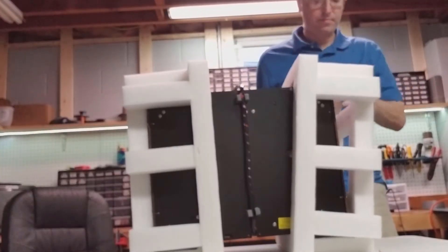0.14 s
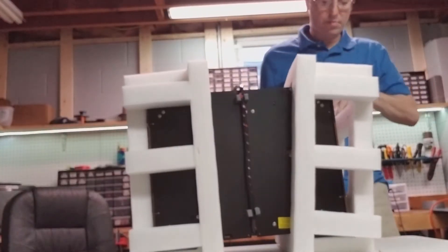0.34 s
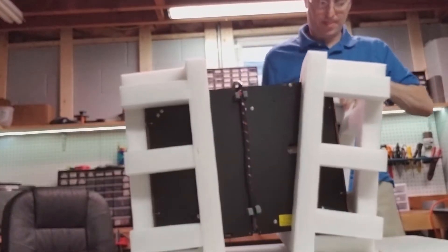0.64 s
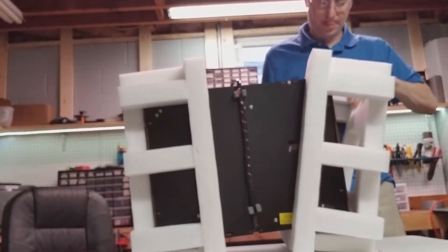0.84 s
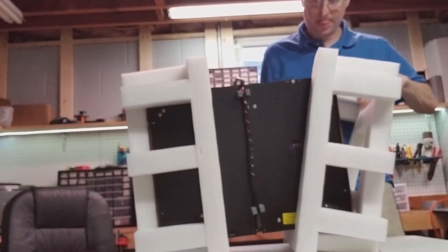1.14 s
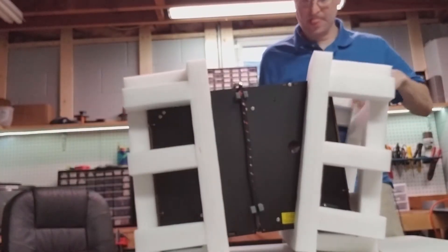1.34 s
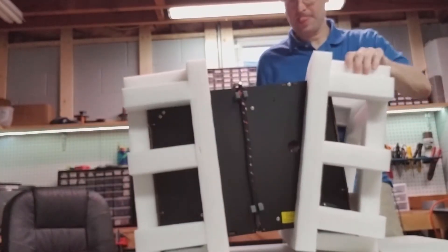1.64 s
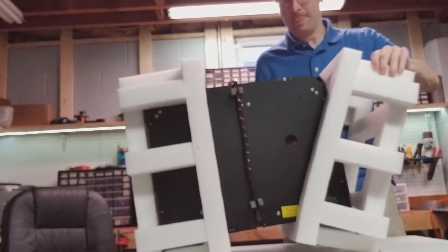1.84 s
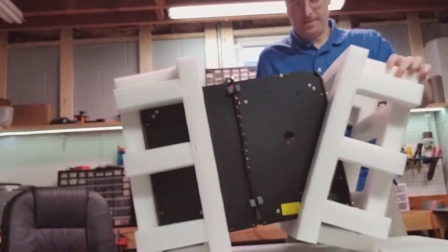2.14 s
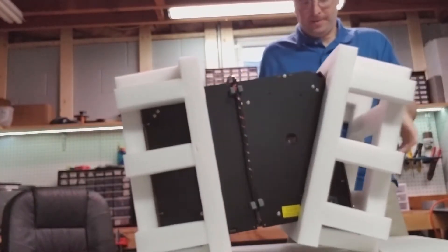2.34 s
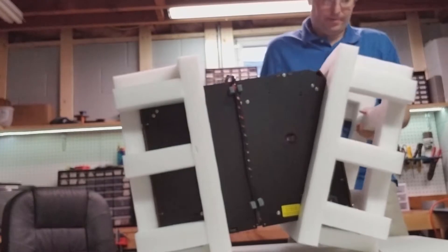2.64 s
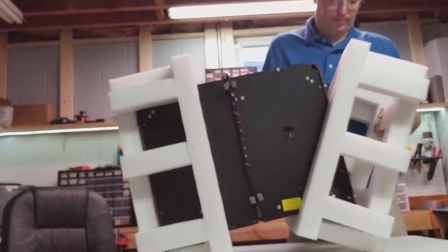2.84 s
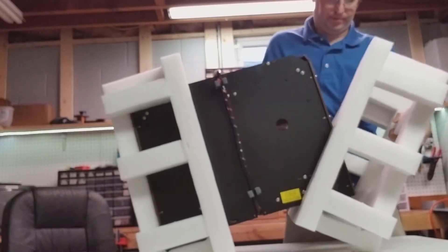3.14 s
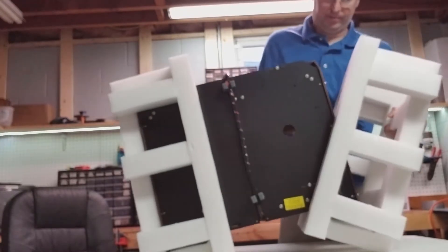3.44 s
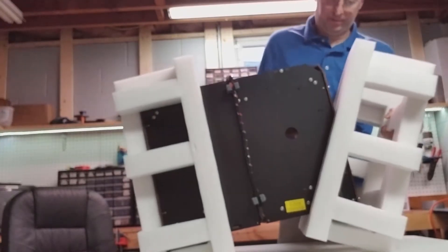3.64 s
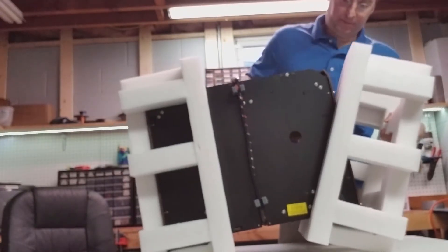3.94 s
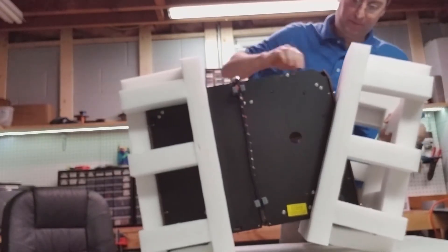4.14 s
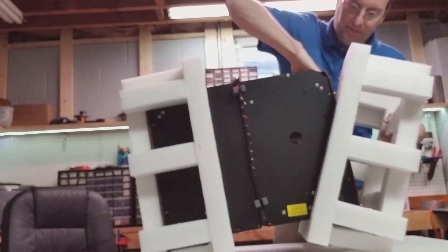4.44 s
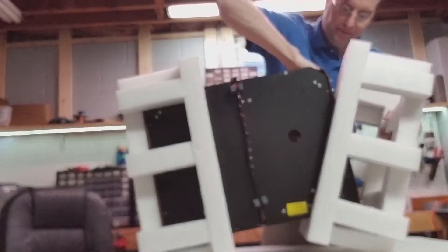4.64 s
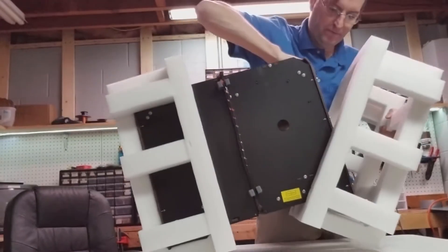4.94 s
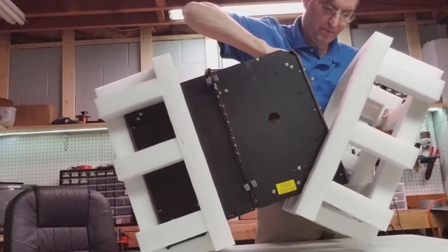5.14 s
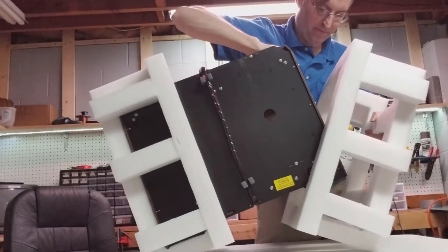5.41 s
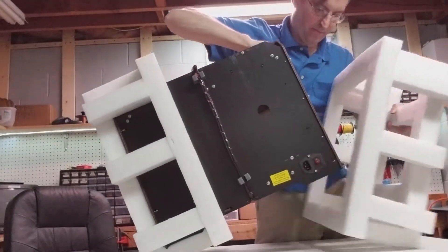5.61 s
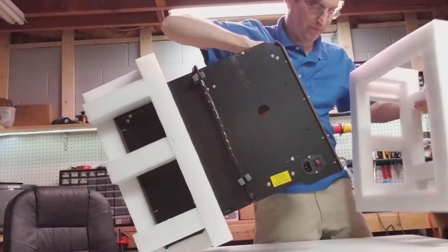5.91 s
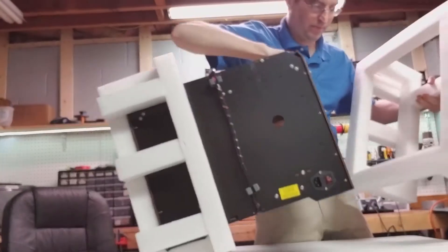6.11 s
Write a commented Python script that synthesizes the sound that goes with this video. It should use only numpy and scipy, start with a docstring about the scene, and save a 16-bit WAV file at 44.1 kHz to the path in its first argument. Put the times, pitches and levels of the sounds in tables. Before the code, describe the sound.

A foam packing frame is rocked loose from a heavy metal case, rubbing and scraping in short, uneven strokes. Soft knocks and brief groaning squeaks come as it sticks and slips, and the case bumps the bench with low thuds. The rubbing eases for a while, then the foam comes free in one quick, louder pull, followed by a light tap. Heard close up in a small, quiet workshop.

```python
"""Foam hisses and scrapes on metal: a packing frame is being rocked loose and dragged off a case.
It sticks and slips on the panels, groans under a firm grip and bumps, while the heavy case sets the
bench booming. The foam comes free in one quick pull and is tapped once more.
Heard from nearby in a small, quiet workshop, through a stereo microphone with two closely spaced ports."""
import sys
import numpy as np
from scipy import signal
from scipy.fft import rfft, irfft, next_fast_len
from scipy.io import wavfile

SR = 44100
rng = np.random.default_rng(int(sys.argv[2]) if len(sys.argv) > 2 else 0)


def generate_wav(signal):
    """Clip the signal to [-1, 1] and save it as 16-bit WAV at the path in sys.argv[1]."""
    frames = np.transpose(np.atleast_2d(signal))
    scaled = np.clip(frames, -1, 1) * 32767
    pcm = np.round(scaled).astype(np.int16)
    wavfile.write(sys.argv[1], SR, pcm)


N = 276507


def from_db(db):
    """Decibels to gain."""
    return 10 ** (np.asarray(db) / 20)


def unit_rms(x):
    """Scale to unit power."""
    return x / np.sqrt(np.mean(x ** 2) + 1e-20)


def at_hz(points, hz):
    """Read a table on a log-frequency axis."""
    known_hz, values = np.transpose(points)
    return np.interp(np.log(np.maximum(hz, 1)), np.log(known_hz), values)


def colour(x, spectrum):
    """Give a steady sound a smooth spectrum."""
    size = next_fast_len(N, True)
    gain = from_db(at_hz(spectrum, np.fft.rfftfreq(size, 1 / SR)))
    return irfft(rfft(x, size) * gain, size)[..., :N]


def butter(x, hz, kind, order=2):
    """Causal Butterworth filter."""
    sections = signal.butter(order, np.clip(hz, 10, .45 * SR), kind, fs=SR, output="sos")
    return signal.sosfilt(sections, x + 1e-18)


def add(track, start_s, sound):
    """Mix a short sound into a track."""
    start = max(round(start_s * SR), 0)
    track[start:start + len(sound)] += sound[:N - start]


# Still workshop air all round the microphone: frequency_hz, relative_density_db
AIR_SPECTRUM = [(15, -30), (25, -15), (50, -6), (75, -2), (115, -2), (150, -14), (420, -24.5), (950, -26),
                (1600, -29.5), (6400, -36.5), (13900, -35.5), (15500, -30)]

def room_tone(level_db=-67.5, apart_hz=600):
    """A low rumble common to both ports under a faint hiss of their own."""
    mid, side = colour(rng.standard_normal((2, N)), AIR_SPECTRUM)
    side = butter(side, apart_hz, "high", order=1) + from_db(-8) * side
    return from_db(level_db) * unit_rms(mid + side * [[1], [-1]])


# How long the small room rings: frequency_hz, t60_s
ROOM_DECAY = [(150, 0.53), (700, 0.11), (2000, 0.1), (12000, 0.13)]
# Echo against direct sound at the microphone, before echo_db is added: frequency_hz, ratio_db
ROOM_ECHO = [(100, -12.5), (300, -7), (1000, 2.5), (3000, 8), (12000, 3.5)]

def workshop(source, echo_db, port_lag_s=0.000096, lag_spread_s=0.00004, port_spacing_s=0.000586):
    """Direct sound reaches the left port first; dense echoes, alike at both in the bass, die by band."""
    t = np.arange(SR // 2) / SR
    hz = np.fft.rfftfreq(len(t), 1 / SR)
    alike = np.sinc(2 * hz * port_spacing_s)
    mid, side = rfft(rng.standard_normal((2, len(t))))
    diffuse = np.sqrt((1 + alike) / 2) * mid + np.sqrt((1 - alike) / 2) * side * [[1], [-1]]
    wet = from_db(at_hz(ROOM_ECHO, hz) + echo_db)
    total = np.sqrt(1 + wet ** 2)
    lags_s = np.array([[0], [rng.normal(port_lag_s, lag_spread_s)]]) + 20 / SR
    response = irfft(np.exp(-2j * np.pi * hz * lags_s) / total, len(t))
    edges_hz = np.append(0, np.geomspace(SR / 128, SR / 2, num=7))
    onset = 1 - np.exp(-t / 0.00022)
    for low, high in zip(edges_hz, edges_hz[1:]):
        decay = onset * from_db(-60 * t / at_hz(ROOM_DECAY, (low + high) / 2))
        band = irfft(diffuse * (hz >= low) * (hz < high) * wet / total, len(t))
        response += band * decay / np.linalg.norm(decay)
    return signal.oaconvolve(source[None], response, axes=1)[:, :N]


# Modes of the bench under the case: pitch_hz, level_db, t60_s
BENCH_MODES = [(53.5, -8.5, 0.49), (77.4, -0.5, 0.244), (100.7, -4, 0.15), (134.3, -4.5, 0.34),
               (198.2, 4.5, 0.2)]
# The heavy case rocks on the bench: start_s, gain_db
CASE_ROCKS = [(0.191, -47.5), (0.31, -52), (1.62, -40), (1.681, -41.5), (1.759, -55), (2.297, -41.5),
              (2.362, -44.5), (2.682, -52), (2.898, -56), (5.322, -44.5)]

def bench_booms(rise_s=0.012):
    """Each shift of the case's weight sets the bench booming."""
    out, t = np.zeros(N), np.arange(SR // 2) / SR
    for start_s, gain_db in CASE_ROCKS:
        boom = sum(from_db(level_db + rng.normal() - 60 * t / t60_s) * np.sin(2 * np.pi * pitch_hz * t)
                   for pitch_hz, level_db, t60_s in BENCH_MODES)
        add(out, start_s, from_db(gain_db) * boom * (1 - np.exp(-t / rise_s)))
    return out


# Modes of the metal case and its foam frame: pitch_hz, width_hz, gain_db
CASE_MODES = [(168.4, 2.8, 1), (195, 3.7, 4), (235, 17, -3.5), (255.5, 69, 6.5), (367.6, 14, 6),
              (470, 12, -17), (530.3, 13, 8), (631, 32, 5.5), (682.6, 25, 9.5), (829.6, 28, 6.5),
              (1125, 104, 3.5), (1315, 61, -5.5), (1390, 14, -13), (2274, 45, 1.5), (2410, 41, -3),
              (2628, 15, 6)]

def ring_case(force, ring_db):
    """A push is heard directly and through the ringing of panels and frame."""
    out = force.copy()
    for pitch_hz, width_hz, gain_db in CASE_MODES:
        radius = np.exp(-np.pi * width_hz / SR)
        gain = from_db(gain_db + ring_db) * (1 - radius ** 2) / 2
        feedback = [1, -2 * radius * np.cos(2 * np.pi * pitch_hz / SR), radius ** 2]
        out += signal.lfilter([gain, 0, -gain], feedback, force + 1e-18)
    return out


# Foam knocks against case and hand: start_s, peak_db, contact_bandwidth_hz, relative_crunch_db
FOAM_BUMPS = [(0.134, -41, 2550, -10), (0.158, -45, 2500, -12), (0.250, -44, 300, -1),
              (0.313, -38, 795, -7), (0.729, -41.5, 352, -5), (1.185, -33, 433, -21), (1.26, -36, 394, -40),
              (1.357, -46.5, 350, -16), (1.39, -44, 189, -15), (1.41, -42, 195, -39),
              (1.619, -39.5, 244, -19), (1.647, -30.5, 1200, -14), (1.66, -33.5, 256, -24),
              (1.693, -36.5, 250, -10), (2.134, -35.5, 2500, -17), (2.25, -38.5, 217, -17),
              (2.293, -32.5, 2920, 2), (2.297, -29.5, 220, -28), (2.634, -35.5, 1810, -7),
              (3.191, -39, 348, -18), (3.448, -38.5, 1540, -11), (3.492, -48, 258, -19),
              (4.332, -51, 250, -15), (4.41, -36, 1300, -20), (4.673, -49, 2510, 5), (5.229, -49, 260, -19),
              (5.356, -40, 200, -13), (5.548, -32, 300, -27), (5.582, -39, 600, -31),
              (6.029, -43.5, 2580, -1), (6.039, -42, 785, -1), (6.051, -50, 356, -15)]

def bumps(crunch_s=0.021, lowest_hz=170, foam_top_hz=2900):
    """A soft contact, then a brief crunch as the foam settles; the frame passes little treble."""
    out, t = np.zeros(N), np.arange(SR // 4) / SR
    for start_s, peak_db, contact_hz, crunch_db in FOAM_BUMPS:
        force = from_db(crunch_db - 4.5) * rng.standard_normal(len(t)) * np.exp(-t / crunch_s)
        force[0] -= 1  # the contact itself
        force = butter(butter(force, contact_hz, "low"), lowest_hz, "high")
        sound = butter(ring_case(force, ring_db=-8.5), foam_top_hz, "low", order=8)
        add(out, start_s, from_db(peak_db) * sound / np.abs(sound).max())
    return out


# Foam judders on the panels: middle_s, length_s, first_pitch_hz, last_pitch_hz, level_db
FOAM_GROANS = [(0.319, 0.027, 314, 275, -48), (0.988, 0.096, 231.5, 272.6, -48),
               (1.063, 0.084, 273.5, 322, -55), (1.886, 0.056, 371.5, 348, -39),
               (4.435, .06, 340.3, 322.6, -42)]

def groans(jitter=0.05, foam_band_hz=(600, 1200)):
    """Under a firm grip the slips lock into a wavering, nearly regular train."""
    out = np.zeros(N)
    for middle_s, length_s, first_hz, last_hz, level_db in FOAM_GROANS:
        samples = round(length_s * SR)
        waver = unit_rms(butter(rng.standard_normal(SR // 4), 300, "low"))[-samples:]
        slip_hz = np.linspace(first_hz, last_hz, samples) * (1 + jitter * waver)
        phase = 2 * np.pi * np.cumsum(slip_hz) / SR
        saw = sum(np.sin(k * phase) / k for k in range(1, 8))
        sound = unit_rms(butter(saw, foam_band_hz, "band")) * np.hanning(samples)
        add(out, middle_s - length_s / 2, from_db(level_db) * sound)
    return out


# Brief rasps, rough squeaks, ticks, a crack and a low growl:
# middle_s, length_s, centre_hz, width_hz, level_db
FOAM_RASPS = [(0.169, 0.03, 1600, 500, -42), (1.728, 0.12, 2120, 350, -47.5),
              (2.158, 0.073, 2510, 2680, -40), (2.196, 0.12, 4630, 2170, -40.5),
              (2.215, 0.075, 2340, 497, -42), (2.297, 0.016, 6000, 9000, -46),
              (2.304, .035, 2560, 700, -38), (4.436, 0.044, 1890, 348, -48.5),
              (4.442, 0.043, 1014, 220, -48), (4.92, 0.022, 13500, 4000, -58),
              (4.964, .02, 11100, 3000, -60), (5.591, 0.075, 282, 85.5, -39),
              (5.593, 0.076, 580, 395, -38.5), (5.610, 0.036, 2690, 330, -34.5),
              (5.612, 0.067, 6700, 3100, -39.5)]

def rasps():
    """Each is a short band of noise that swells and dies away."""
    out = np.zeros(N)
    for middle_s, length_s, centre_hz, width_hz, level_db in FOAM_RASPS:
        samples = round(length_s * SR)
        band_hz = [centre_hz - width_hz / 2, centre_hz + width_hz / 2]
        noise = butter(rng.standard_normal(SR // 4), band_hz, "band")[-samples:]
        add(out, middle_s - length_s / 2, from_db(level_db) * unit_rms(noise) * np.hanning(samples))
    return out


def chirps(count=150, lowest_hz=300, highest_hz=4500, length_s=0.025, glide=0.051):
    """Here and there a small spot of foam slips regularly for a moment, at a pitch of its own."""
    out, progress = np.zeros(N), np.linspace(0, 1, round(length_s * SR))
    for when, pitch, bend in rng.random((count, 3)):
        hz = lowest_hz * (highest_hz / lowest_hz) ** pitch
        phase = 2 * np.pi * hz * length_s * (progress + glide * (2 * bend - 1) * progress ** 2)
        add(out, when * N / SR, np.sqrt(hz) * np.sin(phase) * np.hanning(len(progress)))
    return unit_rms(out)


def slips(per_s, spread_db, smooth_db):
    """Foam cells catch and let go at random, over a smooth sliding friction."""
    sizes = from_db(spread_db * np.clip(rng.standard_normal(N), -2, 2)) * rng.choice([-1, 1], N)
    clicks = sizes * (rng.random(N) < per_s / SR)
    return unit_rms(clicks) + from_db(smooth_db) * rng.standard_normal(N)


# Tone of foam rubbing on metal: frequency_hz, relative_density_db
FOAM_SPECTRUM = [(60, -3), (120, 0.5), (250, -1), (430, 0), (680, -2.5), (950, 0.5), (1400, -10.5),
                 (2600, -15), (3400, -16), (5000, -21.5), (7700, -23.5), (9300, -29.5), (13000, -26.5),
                 (15500, -30)]

def drag(grip):
    """One patch of contact: coarse slips shake frame and case, the finest hiss off the foam's skin."""
    flex, rub, scrape, hiss = grip
    coarse = slips(per_s=260, spread_db=1.5, smooth_db=-12) + from_db(-14) * chirps()
    fine = slips(per_s=1100, spread_db=5.5, smooth_db=-4)
    body = colour(ring_case(coarse, ring_db=-1.5), FOAM_SPECTRUM)
    skin = colour(fine, FOAM_SPECTRUM)
    out = flex * unit_rms(butter(body, [125, 450], "band", order=3))
    out += rub * unit_rms(butter(body, [450, 1500], "band", order=3))
    out += scrape * unit_rms(butter(body, [1500, 3050], "band", order=4))
    return out + hiss * unit_rms(butter(skin, 2910, "high", order=3))


# Strokes of foam along the case, in front of the microphone:
# full_grip_s, attack_s, hold_s, release_s, level_db, brightness_db, extra_scrape_db, extra_flex_db
FOAM_STROKES = [ (0.002, 0.03, 0.0034, .11, -46.5, 2.5, 0.5, -2),
                (0.169, 0.051, 0.011, 0.1, -42, 1, 0.5, 0), (0.24, .06, 0.11, 0.13, -53, -2, -1.5, 3.5),
                (0.429, 0.22, 0.17, .1, -53.5, 0, 1.5, -2),
                (0.624, 0.094, 0.026, 0.077, -52.5, 0, 1.5, 7.5), (0.704, 0.2, .05, .1, -47.5, -1, 1, -1),
                (0.977, 0.07, 0.028, 0.17, -49.5, -3, -2, 0),
                (1.05, 0.11, 0.024, 0.082, -53, -9, -2.5, 0.5),
                (1.191, .012, .015, 0.042, -55, -3, 0, 11.5), (1.237, 0.12, 0.11, 0.094, -54, 0, 0, 1),
                (1.57, 0.14, .02, 0.064, -78, -7, -17, 20), (1.622, .012, 0.21, 0.095, -51.5, 0, -3, 4.5),
                (1.647, .003, 0.013, 0.041, -43, -5, -3, -13), (1.768, 0.11, 0.032, .06, -43, 0, 1.5, -3),
                (1.887, 0.094, 0.012, 0.14, -46.5, -1.5, 1.5, -0.5),
                (1.978, 0.032, 0.2, 0.14, -63.5, -2, 4, -0.5),
                (2.164, 0.067, 0.044, 0.14, -42.5, 5.5, 1.5, -9.5),
                (2.289, 0.0058, 0.011, 0.18, -43, 1, 1.5, 2.5), (2.476, .07, 0.06, 0.083, -52, 5, -3, -3.5),
                (2.623, 0.011, 0.083, .1, -46.5, -0.5, -1, -8),
                (2.752, 0.18, 0.059, 0.12, -42, -2, 0.5, 0.5), (2.887, 0.077, 0.11, 0.14, -42, -2, 1, 0),
                (3.183, 0.12, 0.016, 0.13, -51, -1, -0.5, -3), (3.346, 0.092, 0.13, .1, -54, .5, 3, -2.5),
                (3.489, 0.052, 0.039, 0.13, -52.5, -2.5, 2, 5.5),
                (3.754, 0.074, 0.078, 0.087, -51, -2, 1, 3),
                (4.117, 0.22, 0.022, 0.12, -75.5, 4.5, -3.5, -1),
                (4.346, 0.041, 0.19, 0.14, -62, -3.5, -1, 6),
                (4.407, 0.027, .035, 0.14, -56.5, -2.5, -2, 1),
                (4.562, 0.069, 0.033, 0.2, -69.5, 3.5, 0, 18),
                (4.677, 0.024, 0.032, 0.12, -49, -2, 1.5, -0.5), (4.8, 0.14, 0.07, 0.26, -58, -1, 3, -1),
                (5.138, 0.13, 0.035, .15, -56.5, -0.5, -0.5, -10),
                (5.294, 0.15, 0.015, 0.097, -41.5, 0.5, 0, -0.5),
                (5.37, 0.065, 0.19, 0.12, -65.5, -8.5, 0, 6),
                (5.58, 0.098, 0.029, 0.093, -37, 0.5, -1.5, -4),
                (5.69, .05, 0.026, .22, -69.5, -3, -6.5, -1), ]

def strokes(flex_db=-3, rub_db=-3, scrape_db=-1, hiss_db=-1.5):
    """Gains of flexing, rubbing, scraping and hiss as each stroke takes hold, slides and slackens."""
    t, power = np.arange(N) / SR, np.zeros((4, N))
    fade_db = [20, 20, 20, 23]  # per attack or release; the hiss needs speed, so it changes more
    for grip_s, attack_s, hold_s, release_s, level_db, bright, extra_scrape, extra_flex in FOAM_STROKES:
        slack = np.maximum(grip_s - t, 0) / attack_s + np.maximum(t - grip_s - hold_s, 0) / release_s
        sliding = slack < 3
        bands_db = np.array([flex_db + extra_flex, rub_db - bright,
                             scrape_db + extra_scrape, hiss_db + bright])
        power[:, sliding] += from_db(level_db + bands_db[:, None] - np.outer(fade_db, slack[sliding])) ** 2
    return np.sqrt(power)


def scene(patches=4, surge_db=0.5, surge_hz=70):
    """The frame rubs at several patches, each with its own echoes; all surge as the grip catches."""
    surge = unit_rms(butter(rng.standard_normal(N), surge_hz, "low"))
    grip = strokes() * from_db(surge_db * surge)
    rubbing = sum(workshop(drag(grip) + rasps(), echo_db=-2.5) for _ in range(patches))
    handling = workshop(bumps() + groans() + bench_booms(), echo_db=1.0)
    balance = from_db([[1.3], [.7]])  # a little louder on the left
    return balance * (rubbing / np.sqrt(patches) + handling) + room_tone()


def record(dry, cutoff_hz=15850):
    """The recorder cuts the highest treble steeply."""
    return signal.sosfilt(signal.ellip(12, .1, 80, cutoff_hz, fs=SR, output="sos"), dry)


dry = scene()
out = record(dry)
generate_wav(out)
```